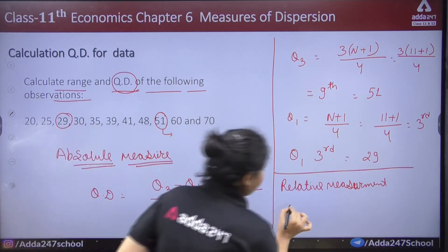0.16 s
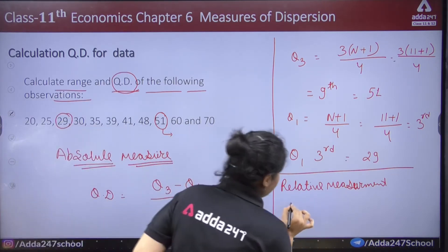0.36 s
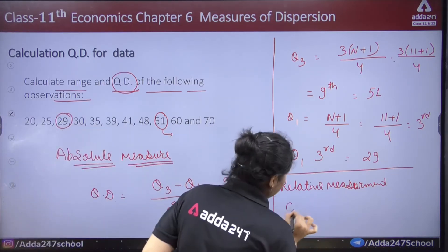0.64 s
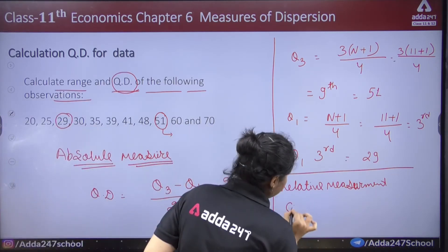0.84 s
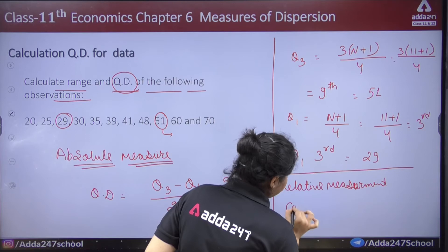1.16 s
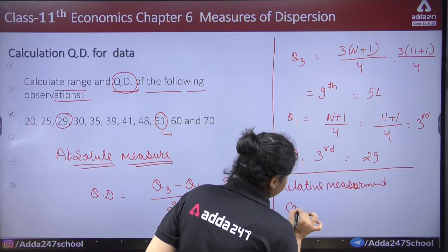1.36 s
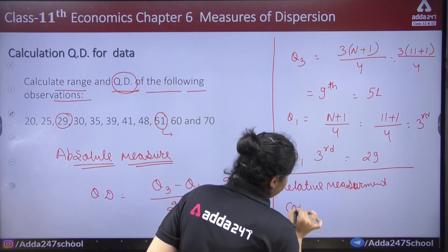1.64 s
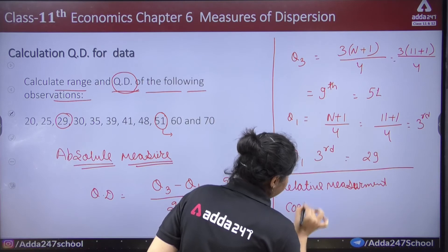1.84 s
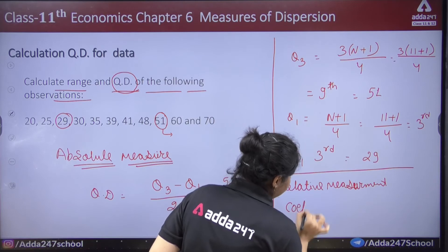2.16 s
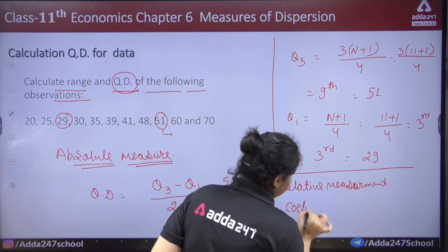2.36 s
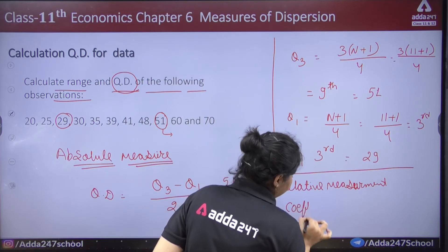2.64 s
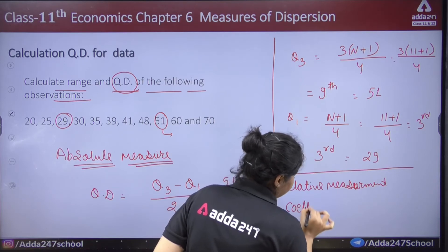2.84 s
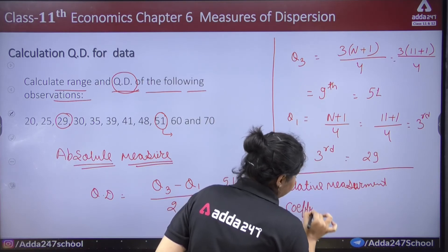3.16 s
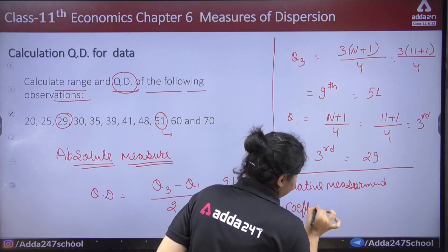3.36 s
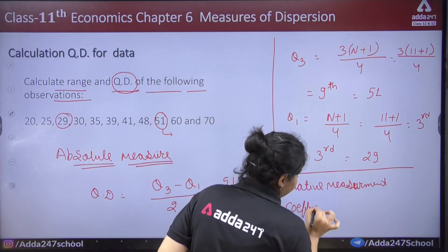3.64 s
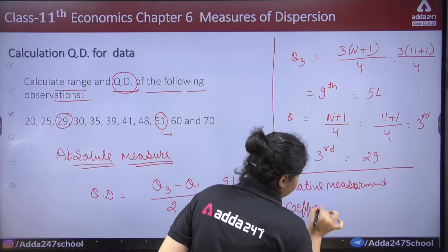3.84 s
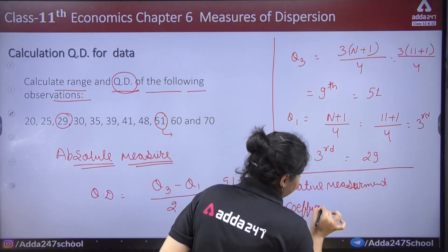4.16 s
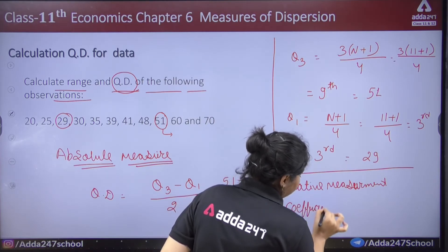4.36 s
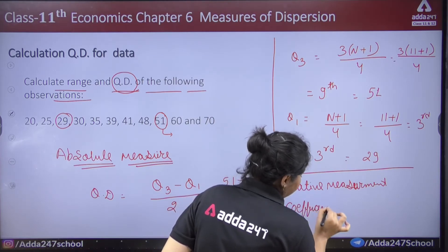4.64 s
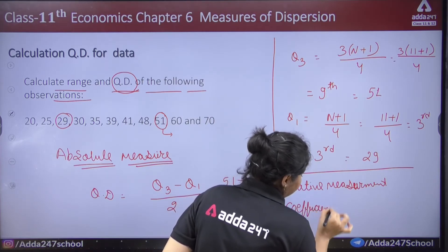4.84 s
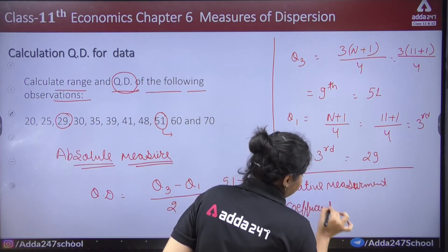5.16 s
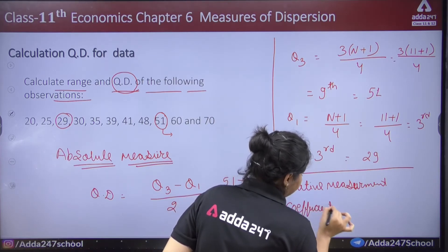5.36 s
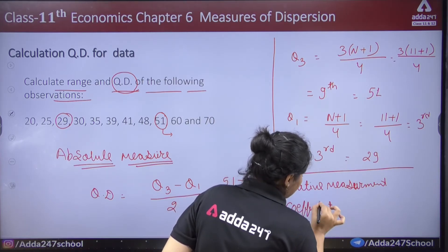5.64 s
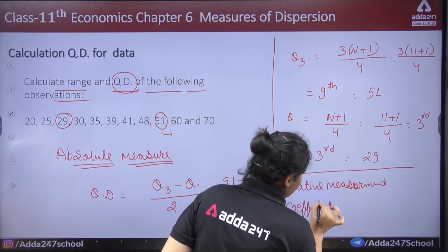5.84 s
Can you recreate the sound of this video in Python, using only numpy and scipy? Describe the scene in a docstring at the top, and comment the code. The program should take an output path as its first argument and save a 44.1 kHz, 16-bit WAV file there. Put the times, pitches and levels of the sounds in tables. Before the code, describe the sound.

In a quiet classroom a pen writes on a hard wall board. A few hollow knocks and broad airy strokes come first, then a long run of short, narrow, hissing strokes, fading and brightening, before two final knocks with small plastic clicks. A low mains hum, faint fan murmur, very high whine and slight air hiss run throughout, heard through a humming, fairly close microphone.

```python
"""Throughout, there is a low mains hum, fan murmur, thin whine and air hiss in a quiet classroom.
Over them a pen writes on a wall board, first in broad, hissing strokes, then in narrower ones, with
two broad strokes again near the end. A humming microphone hears it all.
Hum, fan and whine are sine tones; the strokes are filtered noise, shaped by short arcs of speed.
The tip knocks the panel into ringing, the pen ticks in the hand, and light taps, a soft bump
and one faint swelling ring pass by."""
import sys
import numpy as np
from scipy import signal
from scipy.fft import rfft, irfft, next_fast_len
from scipy.io import wavfile
from scipy.ndimage import uniform_filter1d

SR = 44100
rng = np.random.default_rng(int(sys.argv[2]) if len(sys.argv) > 2 else 0)


def pcm_store(signal):
    """Save signal as 16-bit PCM."""
    levels = np.round(np.clip(np.atleast_2d(signal), -1, 1) * 32767)
    wavfile.write(sys.argv[1], SR, levels.astype(np.int16).T)


N = 264600
T = np.arange(N) / SR  # time of every sample, s
HZ = np.arange(N // 2 + 1) * SR / N + 1e-3  # frequency grid, kept just above zero for the logarithm

# mains hum: (multiple of the mains frequency, level/dB rms)
HUM_TONES = [(1, -38.5), (2, -58), (4, -70.5)]
MAINS_HZ = 50.084
# fan tones: (f/Hz, level/dB rms)
FAN_TONES = [(276, -69.5), (350, -73.5), (443, -76.5), (831, -78)]
# steady electronic whine: (f/Hz, level/dB rms)
WHINE_TONES = [(4500, -88), (8877, -87), (9115, -86), (14703.5, -85), (14803.7, -81), (14903.8, -85),
               (15003.8, -64.7), (15104, -85)]
# whines that come and go: (start t/s, end t/s, f/Hz, level/dB rms)
WHINE_SPELLS = [(1.5, 3.6, 5333, -86), (4.5, 6, 5333, -83.5), (3.75, 6, 8000, -81.5)]
# room air and microphone hiss: (f/Hz, level/dB per Hz)
AIR_SPECTRUM = [(20, -95), (45, -66.5), (75, -80), (130, -84.5), (200, -86), (320, -94.5), (460, -92),
                (650, -98.5), (850, -100), (1200, -103), (2000, -107.7), (5000, -111), (15000, -110.5)]
# faint ring: start, loudest and end times in s, then its pitch and its rms level at the loudest moment
RING_START_S, RING_LOUDEST_S, RING_END_S = 2.63, 3.06, 3.08
RING_HZ, RING_DB = 451, -64

# low panel modes woken by a soft bump: (f/Hz, level/dB, t60/s)
BUMP_MODES = [(132.6, -25, .17), (181.3, -35.5, .22), (121, -42, 0.15), (251, -45, 0.19)]
BUMP_S = .4995
# light taps and scuffs on the panel: (t/s, level/dB, f/Hz, t60/s)
PANEL_TAPS = [(1.261, -48.5, 690, 0.048), (1.623, -60.5, 1290, 0.1), (1.875, -62.5, 1390, 0.14),
              (2.29, -60.5, 840, .12), (5.802, -55.5, 1580, .025), (5.846, -36.5, 1500, 0.0046),
              (5.846, -48.5, 646, .015)]
TAP_WIDTH_HZ = 166

# the pen clicking in the hand: (t/s, level/dB, f/Hz that the contact excites most)
PEN_CLICKS = [(0.8802, -37, 5300), (0.896, -46, 2200), (2.374, -47.5, 3760), (5.638, -36.5, 2620),
              (5.6405, -35.5, 14500), (5.6959, -32, 6800), (5.7002, -29.5, 7760), (5.806, -48, 2500),
              (5.8473, -44, 3500)]
# ringing modes of the pen: (f/Hz, level/dB, t60/s)
PEN_MODES = [(2800, 1, 0.0048), (5060, -5, 0.0092), (6200, -7.5, 0.0035), (8360, 0.5, 0.0031),
             (10600, -0.5, 0.0042), (13400, 1, 0.0057)]
FOCUS_DB = 11.5  # modes fall by this much per octave away from the contact's frequency
BOUNCE_S, BOUNCE_DB = .0074, -14  # each click's rebound: delay, and level against the click

# the tip landing: (t/s, level/dB, tick level/dB, ring level/dB, contact time/s);
# a resting hand damps the panel, which lowers the ring
TIP_KNOCKS = [(0.4277, -18, -47.5, -0.5, 0.00014), (0.908, -12.5, -44, -2.5, .0001),
              (1.5041, -15.5, -48.5, -2.5, 0.00013), (5.3934, -16.5, -54, 0, 0.00016),
              (5.7647, -16.5, -50, 0, 0.00017)]
# ringing modes of the panel: (f/Hz, level/dB, t60/s)
PANEL_MODES = [(131, -30.5, 0.63), (159, -27.5, 0.3), (251.2, -27, 0.32), (279, -43, 0.59),
               (358.4, -26, 0.26), (409, -43, .22), (472.6, -35, 0.16), (591, -28, 0.14), (912, -36, 0.085),
               (1073, -21, 0.0098), (1370, -52, .016)]
# echoes of a knock from the frame and nearby walls: (delay t/s, level/dB)
KNOCK_ECHOES = [(.0068, -8), (0.0105, -9), (0.0152, -10), (.0346, -20), (0.0428, -13.5)]
# colour of the room's answer to a knock: (f/Hz, level/dB)
ROOM_SPECTRUM = [(60, -13), (120, -6), (220, -19), (300, 2.5), (470, -9), (620, -14.5), (800, -15.5),
                 (1000, -30), (1500, -28.5), (2500, -47), (8000, -80)]

# broad, hissing pen strokes: (start t/s, fastest t/s, end t/s, level/dB before the arc of speed)
BROAD_STROKES = [(0, .05, .124, -66.5), (0.306, 0.43, .465, -60), (0.525, 0.727, .76, -57),
                 (0.943, 1.048, 1.36, -62), (1.55, 1.657, 1.8, -70.5), (1.737, 1.848, 1.93, -62.5),
                 (5.417, 5.44, 5.472, -65), (5.768, 5.82, 5.88, -68.5)]
# resonances of the broad strokes: (f/Hz, width f/Hz, level/dB)
BROAD_RESONANCES = [(4360, 3400, -5), (6550, 710, -4), (7030, 2300, -2), (8700, 1100, -3),
                    (11000, 3200, -2.5), (13000, 1000, -5), (14400, 1300, -1)]
BROAD_TILT_DB = 0  # per octave; zero leaves the colour as it is

# narrower pen strokes: (start t/s, length t/s, average level/dB)
PEN_STROKES = [(1.878, 0.18, -57.5), (2.093, 0.14, -53.5), (2.245, 0.12, -54), (2.407, 0.083, -64.5),
               (2.499, 0.14, -61.5), (2.673, 0.15, -54), (2.832, 0.12, -55), (2.998, 0.096, -64.5),
               (3.109, 0.1, -66.5), (3.26, 0.12, -65), (3.391, 0.15, -63.5), (3.57, 0.042, -68),
               (3.783, 0.13, -61.5), (3.906, 0.12, -60), (4.066, 0.12, -61), (4.182, 0.12, -62.5),
               (4.333, 0.12, -64), (4.454, 0.1, -65), (4.592, 0.071, -66), (4.718, 0.076, -65),
               (4.84, 0.099, -64.5), (4.96, 0.13, -58.5), (5.119, 0.12, -58.5)]
# resonances of the rubbing tip: (f/Hz, width f/Hz, level/dB early, level/dB late)
TIP_RESONANCES = [(4710, 550, -9.5, -9), (6570, 670, -1.5, -14), (7620, 370, -2.5, -2),
                  (8700, 1450, -1, -8.5), (10600, 820, -6.5, -4.5), (13320, 1220, 5.5, -8),
                  (14300, 1100, 1, -1)]
# the colour of the strokes shifts between these times: (start t/s, end t/s)
COLOUR_SHIFT_TIMES = (1.9, 4.5)
# a stroke eases in and out around its length, and at its fastest is louder than its average
EASE_S, FASTEST_SHARE, STROKE_DB = 0.0076, 0.43, 2.5
# firmer strokes, and later ones, are brighter (tilts in dB per octave)
USUAL_DB, USUAL_TILT_DB, TILT_PER_DB, LATE_TILT_DB = -58, -1.5, 0.35, 2.5
SPEED_POWER = 1.21  # the tip's hiss grows with this power of its speed

TOP_HZ = 15650  # the recorder cuts everything above


def undb(db):
    """Decibels to gain."""
    return 10 ** (np.asarray(db) / 20)


def unit(x):
    """Scale to rms 1."""
    return x / np.sqrt(np.mean(x ** 2))


def fade(t, t60):
    """Exponential decay, 60 dB down at t60."""
    return np.exp(-np.log(1000) * t / t60)


def sine(hz, t):
    """A pure tone of peak 1."""
    return np.sin(2 * np.pi * hz * t)


def tone(db, angle):
    """A sine wave whose rms level is db; the angle is in radians."""
    return np.sqrt(2) * undb(db) * np.sin(angle)


def add(track, s, sound):
    """Mix a sound into the track at time s."""
    i = max(int(s * SR), 0)
    track[i:i + len(sound)] += sound[:max(N - i, 0)]


def band(x, hz, width_hz):
    """A resonance applied twice, for steep skirts."""
    quality = hz / min(width_hz * np.pi / 2, SR / 3)
    b, a = signal.iirpeak(min(hz, .45 * SR), quality, fs=SR)
    return signal.lfilter(b, a, signal.lfilter(b, a, x))


def walk(rate):
    """Smooth random wander of rms 1, with this many new random values per second."""
    size = int(SR / rate)
    steps = np.repeat(rng.standard_normal(N // size + 1), size)
    return unit(uniform_filter1d(steps, size)[:N])


def coloured(points):
    """Noise whose level per Hz follows (Hz, dB) points."""
    hz, db = np.transpose(points)
    colour = undb(np.interp(np.log(HZ), np.log(hz), db)) * np.sqrt(SR / 2)
    return irfft(rfft(rng.standard_normal(N)) * colour, N)


def mains_hum():
    """Mains power hums at multiples of its frequency, with a gently wavering level."""
    hum = sum(tone(db, 2 * np.pi * k * MAINS_HZ * T + k * np.pi) for k, db in HUM_TONES)
    return hum * undb(.25 * walk(9))


def fan():
    """The ventilation murmurs in low tones whose phases wander."""
    return sum(tone(db, 2 * np.pi * hz * T + 1.56 * walk(5)) for hz, db in FAN_TONES)


def whine():
    """Electronics sing in thin, steady tones; a few switch on and off."""
    out = sum(tone(db, 2 * np.pi * (hz * T + rng.random())) for hz, db in WHINE_TONES)
    for start, end, hz, db in WHINE_SPELLS:
        sounding = (T > start) & (T < end)
        out = out + tone(db, 2 * np.pi * hz * T) * sounding
    return out


def room_air():
    """Room air and microphone hiss: coloured noise with a slightly wavering level."""
    return coloured(AIR_SPECTRUM) * undb(0.11 * walk(4.8))


def passing_ring():
    """One faint tone swells slowly and stops quickly."""
    swell = np.interp(T, [RING_START_S, RING_LOUDEST_S, RING_END_S], [0, 1, 0])
    return tone(RING_DB, 2 * np.pi * RING_HZ * T) * swell


def bump():
    """A soft push wakes only the lowest panel modes, with a brief scuff."""
    t, out = T[:SR // 2], np.zeros(N)
    soft_start = 1 - np.exp(-t / 0.0025)
    for hz, db, t60 in BUMP_MODES:
        add(out, BUMP_S, -undb(db) * sine(hz, t) * fade(t, t60) * soft_start)
    scuff = unit(band(rng.standard_normal(len(t)), 1300, 1050))
    add(out, BUMP_S, undb(-59.5) * scuff * fade(t, 0.21))
    return out


def taps():
    """Light touches: a brief rattle of slips drives one resonance of the panel."""
    t, out = T[:SR // 5], np.zeros(N)
    for s, db, hz, t60 in PANEL_TAPS:
        decay = fade(t, t60)
        burst = band(rng.standard_normal(len(t)) * decay, hz, TAP_WIDTH_HZ)
        # give the burst the same energy as its decay curve
        match = np.sqrt(np.sum(decay ** 2) / np.sum(burst ** 2))
        add(out, s, undb(db) * burst * match)
    return out


def clicks():
    """Small plastic contacts ring the pen's modes, most those near the contact's frequency, and rebound once."""
    t, out = T[:SR // 20], np.zeros(N)
    for s, db, contact_hz in PEN_CLICKS:
        ring = np.zeros(len(t))
        for k, (hz, mode_db, t60) in enumerate(PEN_MODES):
            octaves_away = abs(np.log2(hz / contact_hz))
            gain = undb(mode_db - FOCUS_DB * octaves_away)
            ring += (-1) ** k * gain * fade(t, t60) * sine(hz, t)  # neighbours start in opposite directions
        add(out, s, undb(db) * ring)
        add(out, s + BOUNCE_S, undb(db + BOUNCE_DB) * ring)
    return out


def knocks():
    """The panel gives way for one heavy swing, then rings; frame, walls and room answer."""
    t, out = T[:SR // 2], np.zeros(N)
    swing = t / 0.00098
    blow = swing * np.exp(-swing) * sine(335, t)
    echoes = sum(undb(db) * np.interp(t - delay, t, blow, left=0) for delay, db in KNOCK_ECHOES)
    modes = sum(undb(db) * fade(t, t60) * sine(hz, t) for hz, db, t60 in PANEL_MODES)
    # the room needs a few milliseconds to fill
    build_up = 1 - np.exp(-t / .004)
    for s, db, tick_db, ring_db, contact_s in TIP_KNOCKS:
        # the soft tip spreads the push over a fraction of a millisecond
        push = np.exp(-(t[:64] / contact_s - 2) ** 2)
        knock = signal.lfilter(push / push.sum(), 1, blow + echoes + undb(ring_db) * modes)
        room_noise = unit(coloured(ROOM_SPECTRUM)[:len(t)])
        room = undb(ring_db - 25.0) * room_noise * fade(t, 0.23) * build_up
        add(out, s, undb(db) * (knock + room))
        tick = unit(band(rng.standard_normal(len(t)), 7400, 11000))
        add(out, s, undb(tick_db) * tick * fade(t, 0.011))
    return out


def friction(grain_db):
    """Countless tiny slips of uneven size."""
    return unit(rng.standard_normal(N) * undb(grain_db * walk(2500)))


def reflected(x, path_s, sway_s, share):
    """A bounce off the moving hand interferes with the direct sound, so bands of the hiss shift."""
    bounce_time = T - path_s - sway_s * walk(9)
    return x + share * np.interp(bounce_time, T, x)


def dulled(x):
    """Soft surfaces radiate little at the very top."""
    return signal.sosfilt(signal.butter(12, 14750, fs=SR, output="sos"), x)


def gestures(rub, table, sharpness, flutter_db):
    """Each gesture speeds up and slows down in one arc; the rubbing noise follows the speed."""
    out = np.zeros(N)
    rub = rub * undb(flutter_db * walk(70))
    for start, fastest, end, db, tilt_db in table:
        span = slice(max(int(start * SR), 0), int(end * SR))
        piece = rub[span]
        # tilt the spectrum towards bright or dull, flat below a twentieth of the sample rate
        size = next_fast_len(len(piece))
        octaves = np.log2(np.maximum(np.arange(size // 2 + 1) / size, 1 / 20))
        piece = irfft(rfft(piece, size) * undb(tilt_db * octaves), size)[:len(piece)]
        progress = np.interp(T[span], [start, fastest, end], [0, .5, 1])
        speed = np.abs(np.sin(np.pi * progress))
        add(out, start, unit(piece) * speed ** sharpness * undb(db))
    return out


def broad_strokes():
    """The pen rubs the board with a broad hiss: friction noise through wide resonances."""
    rub = np.zeros(N)
    for hz, width, db in BROAD_RESONANCES:
        rub += undb(db + 2.3 * walk(14)) * band(friction(grain_db=3.5), hz, width)
    rub = reflected(rub, path_s=.00046, sway_s=.00003, share=.4)
    strokes = [(*row, BROAD_TILT_DB) for row in BROAD_STROKES]
    return gestures(dulled(rub), strokes, sharpness=0.78, flutter_db=1.1)


def colour_shift(t):
    """How far the colour of the strokes has shifted from early to late, 0 to 1."""
    start_s, end_s = COLOUR_SHIFT_TIMES
    return np.clip((t - start_s) / (end_s - start_s), 0, 1)


def stroke(start, length, db):
    """The arc of one pen stroke; its brightness follows its force and how late it comes."""
    tilt_db = USUAL_TILT_DB + TILT_PER_DB * (db - USUAL_DB) + LATE_TILT_DB * colour_shift(start)
    fastest = start + FASTEST_SHARE * length
    return start - EASE_S, fastest, start + length + EASE_S, db + STROKE_DB, tilt_db


def narrow_strokes():
    """The tip rubs through its narrower resonances, whose balance shifts from early to late."""
    shift = colour_shift(T)
    rub = undb(-11.5) * band(friction(grain_db=2.5), 13300, 9400)
    for hz, width, early_db, late_db in TIP_RESONANCES:
        # the pen's angle keeps changing, so each resonance comes and goes
        db = early_db + (late_db - early_db) * shift + 3.1 * walk(14)
        rub = rub + undb(db) * band(friction(grain_db=-2.5), hz, width)
    rub = reflected(rub, path_s=.00092, sway_s=.00004, share=.42)
    strokes = [stroke(*row) for row in PEN_STROKES]
    return gestures(dulled(rub), strokes, sharpness=SPEED_POWER, flutter_db=0.9)


def scene():
    """Everything at one microphone."""
    background = mains_hum() + fan() + whine() + room_air() + passing_ring()
    touches = bump() + taps() + clicks() + knocks()
    return (background + touches + broad_strokes() + narrow_strokes())[None]


def record(dry):
    """The recorder cuts the top steeply and adds a small steady offset."""
    top_cut = signal.ellip(10, .1, 80, TOP_HZ, fs=SR, output="sos")
    offset = .0138
    return signal.sosfilt(top_cut, dry) + offset


dry = scene()
out = record(dry)
pcm_store(out)
```